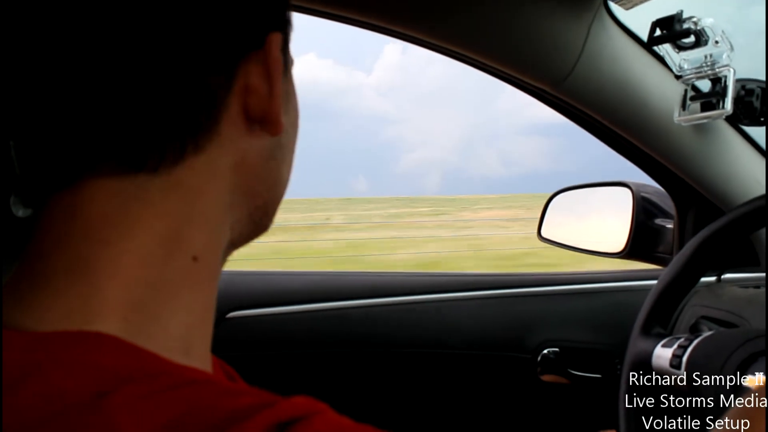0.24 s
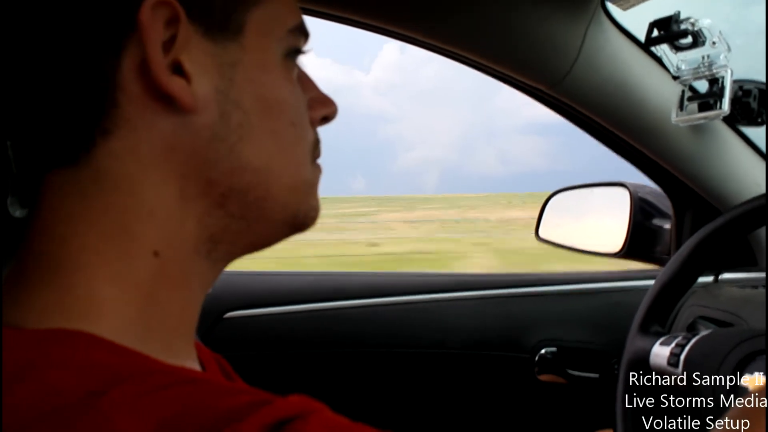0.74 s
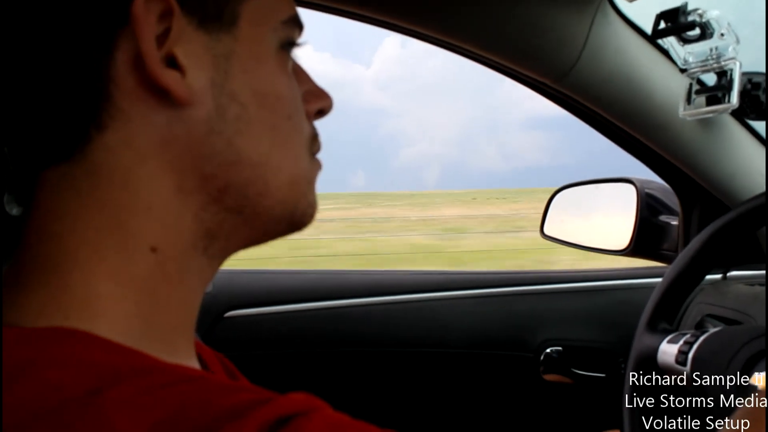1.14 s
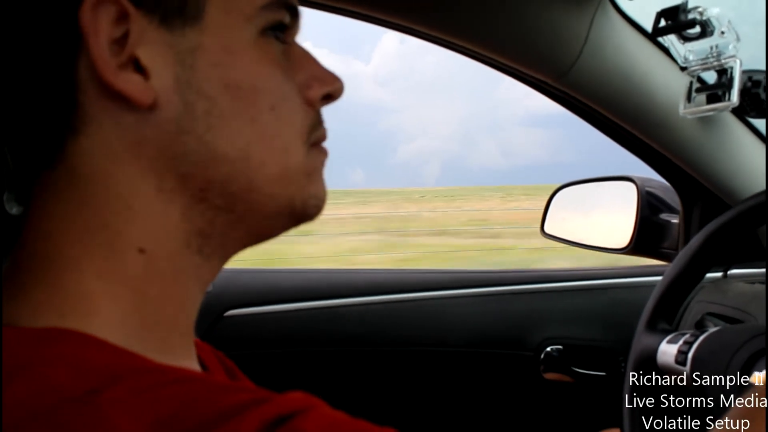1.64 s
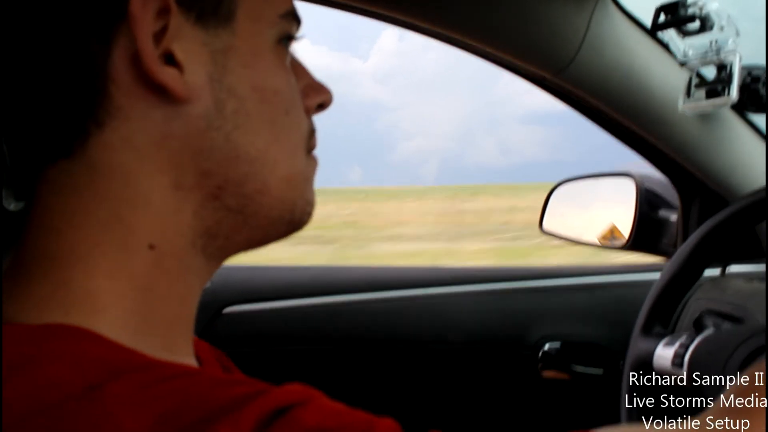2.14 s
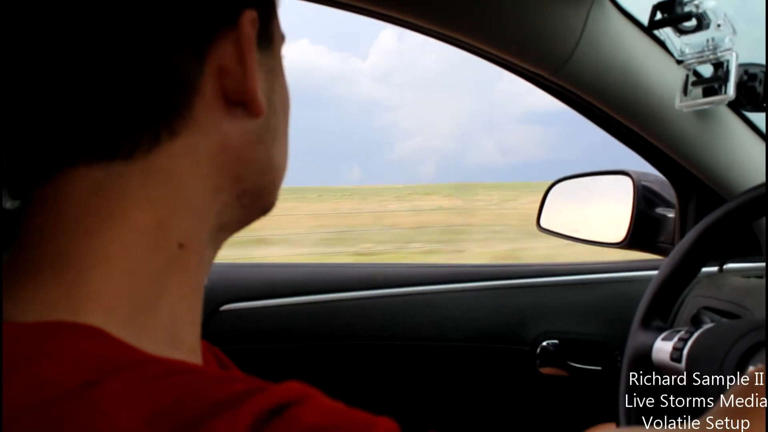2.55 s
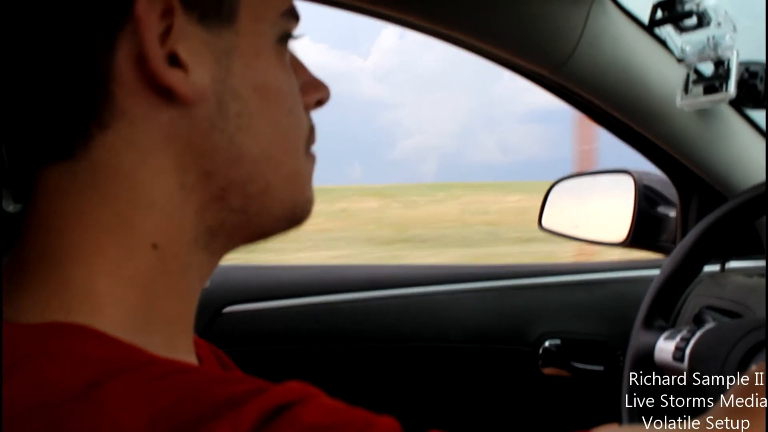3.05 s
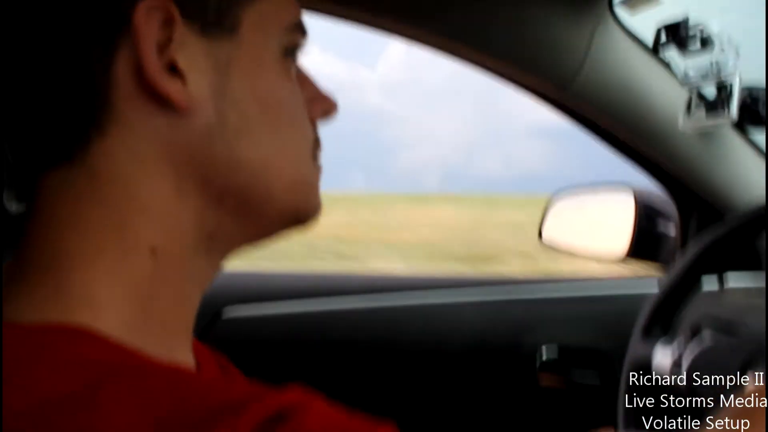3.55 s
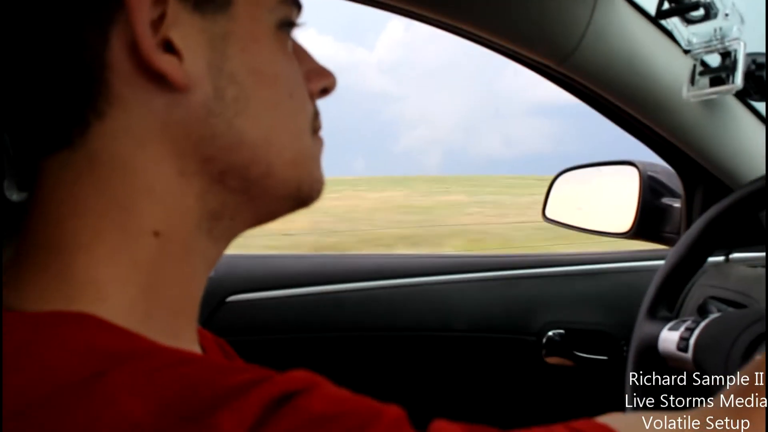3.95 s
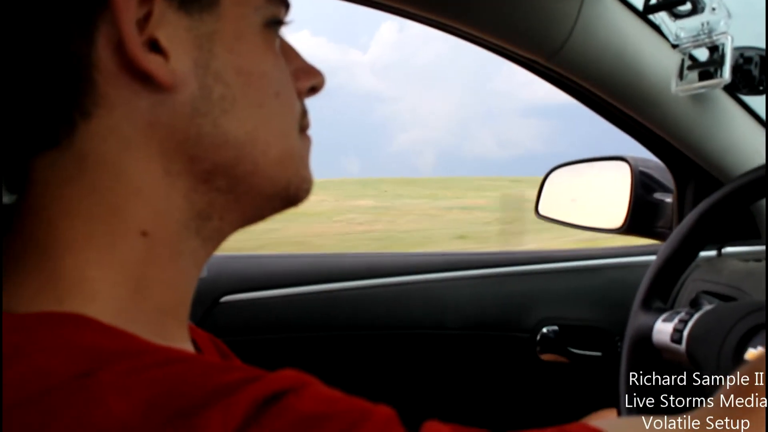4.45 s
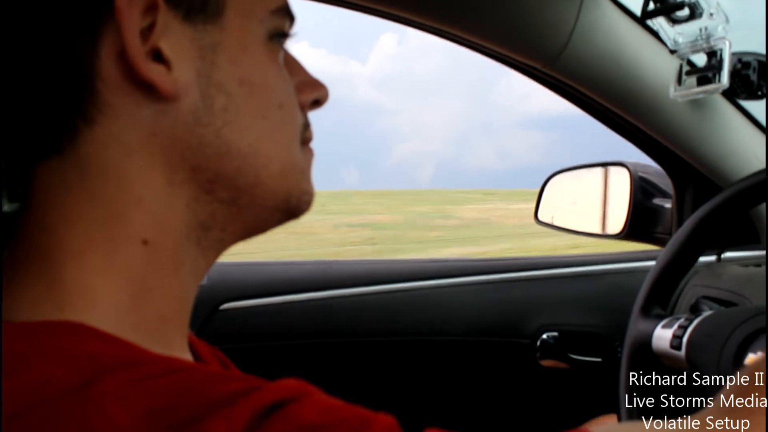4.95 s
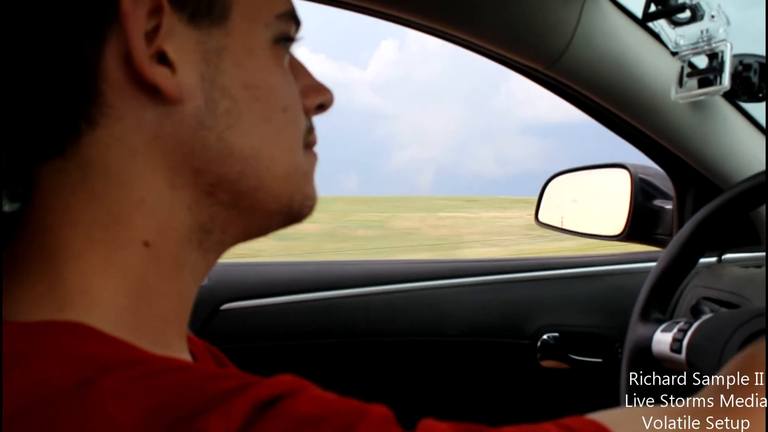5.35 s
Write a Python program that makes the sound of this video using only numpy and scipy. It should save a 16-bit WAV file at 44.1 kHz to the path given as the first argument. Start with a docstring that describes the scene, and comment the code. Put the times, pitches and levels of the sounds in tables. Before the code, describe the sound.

Inside a car on a dirt road, a low, booming tyre rumble runs under irregular wind buffeting and a soft rush of air.

```python
"""Tyres rumble on a dirt and gravel road, heard inside a car running at a steady speed.
They shake the body and set the cabin booming while the car bounces on its springs.
Eddies (small swirls of wind) thud on the microphone, and the hardest overload it.
Rushing air and gravel hiss come in at the side window, whose gap whistles faintly.
Now and then a stone ticks against the underside."""
import sys
import numpy as np
from scipy import signal
from scipy.fft import rfft, irfft
from scipy.io import wavfile
from scipy.ndimage import map_coordinates

SR = 44100
rng = np.random.default_rng(int(sys.argv[2]) if len(sys.argv) > 2 else 0)


def transcribe(u):
    """Save the signal u as a 16-bit wav file named by the first command-line argument.

    u: samples, shape (n,) or (channels, n), limited to [-1, 1]; the rate is SR.
    q: integer samples, one column per channel.
    """
    v = np.clip(np.atleast_2d(u).T, -1, 1)
    q = np.round(v * 32767).astype(np.int16)
    wavfile.write(sys.argv[1], SR, q)


N = 247342
TIME = np.arange(N) / SR
FREQS = np.maximum(np.fft.rfftfreq(N, 1 / SR), 1)


# How loud the road is, the base for rumble and boom: t/s, level/dB
ROAD_LEVEL = [(0, -17), (0.42, -34.5), (0.8, -22), (1.05, -26.5), (1.35, -28.5), (2.0, -24.5),
              (2.45, -20.5), (3.5, -21.5), (4.7, -22), (5.25, -23.5)]
# The tone of the tyres through the car body: f/Hz, relative level/dB
RUMBLE_TONE = [(30, -36), (70, -15), (100, 0.5), (160, -3.5), (215, -2), (280, -7), (335, -13.5),
               (430, -12.5), (540, -15), (800, -25), (2000, -41), (6000, -110)]
def tyre_rumble(air_db, usual_air_db=-43):
    """Tyres shake the body over rough and smooth dirt; the rumble swells with the airflow."""
    patches = undb(0.5 * np.tanh(walk(32)))
    body = unit(through(noise() * patches, colour(RUMBLE_TONE)))
    gust_db = 0.7 * (air_db - usual_air_db)
    return undb(curve(ROAD_LEVEL) - 1 + gust_db) * body


# Stretches of road with ruts: middle t/s, length/s, boost/dB
RUTS = [(0.81, 0.033, 5), (2.11, 0.065, 7.5), (2.41, 0.16, 7), (2.88, 0.058, 3.5), (3.31, 0.032, 7),
        (3.53, 0.047, 10.5), (4.78, 0.028, 14), (5.55, 0.061, 13.5)]
def cabin_boom():
    """The air in the cabin booms at its own low note, louder over ruts."""
    boom = wander(ringing(hz=126.2, width_hz=23.8), share=0.029, rate=5.9)
    return undb(curve(ROAD_LEVEL) - 4 + swells(RUTS)) * boom


# How hard the car bounces: t/s, level/dB
BOUNCE_LEVEL = [(0.05, -27), (0.55, -28), (0.83, -25.5), (1.1, -30), (1.95, -29.5), (2.25, -22.5),
                (3.05, -19.5), (3.2, -22.5), (3.8, -25.5), (4.05, -22.5), (4.75, -30), (5.5, -27)]
def bounce():
    """The car bounces on its springs with a very deep shudder."""
    shudder = unit(band(noise(), 18, 55, low_order=2, high_order=3))
    return undb(curve(BOUNCE_LEVEL) + 1) * shudder


# The strongest eddies: middle t/s, length/s, level/dB, f/Hz above which the thud fades
STRONG_EDDIES = [(0.054, 0.0057, -5.5, 302), (.151, 0.0022, -7, 480), (.186, 0.0016, -3, 375),
                 (.200, 0.0061, -9.5, 546), (.253, 0.015, -18, 480), (.317, 0.0018, -13, 344),
                 (.372, 0.014, -19.5, 316), (.419, 0.0069, -19, 328), (.483, 0.0078, -18.5, 238),
                 (.511, 0.0061, -9, 207), (.623, 0.003, -15, 304), (.657, 0.0089, -11.5, 172),
                 (.79, 0.0048, -13.5, 380), (.81, 0.091, -17.5, 245), (.848, 0.0077, -11, 307),
                 (.903, .004, -15, 180), (.939, 0.0034, 1, 315), (.946, 0.0014, 1.5, 630),
                 (.964, 0.004, -8, 560), (.978, 0.0056, -8.5, 290), (.98, 0.031, -21, 574),
                 (.999, 0.0032, -9, 276), (1.15, 0.033, -19, 340), (1.152, 0.00156, -4, 520),
                 (1.212, 0.015, -19.5, 410), (1.341, 0.00061, -2.5, 320), (1.526, 0.0086, -12.5, 280),
                 (1.539, 0.0023, -7.5, 240), (1.611, 0.0024, -14, 580), (1.633, 0.04, -18.5, 546),
                 (1.725, 0.00068, -5, 380), (1.763, 0.0077, -13, 305), (2.097, 0.01, -9, 209),
                 (2.685, 0.021, -7, 248), (3.04, 0.0021, -16, 400), (3.076, 0.003, -2.5, 320),
                 (3.083, 0.0033, -5, 200), (3.109, 0.0039, -8.5, 457), (3.118, 0.0019, -4, 380),
                 (3.141, .004, -10, 230), (3.16, 0.0035, -14, 318), (3.521, 0.0032, -6, 189),
                 (3.602, 0.0047, -6.5, 243), (3.62, .0015, -7.5, 310), (3.729, 0.0013, -4, 240),
                 (3.813, 0.0019, -2, 275), (3.889, 0.0085, -8, 263), (3.949, 0.0051, -18, 510),
                 (3.99, 0.037, -16.5, 290), (3.993, 0.0017, -7, 245), (4.07, 0.0038, -10, 540),
                 (4.081, 0.0028, -8, 280), (4.265, 0.0085, -10, 325), (4.32, 0.022, -17.5, 310),
                 (4.346, 0.004, -10.5, 367), (4.415, 0.0063, -17, 420), (4.432, 0.0049, -3, 252),
                 (4.525, 0.0024, -10.5, 225), (4.713, 0.01, -10, 280), (4.725, 0.0018, -7.5, 440),
                 (4.752, 0.008, -12, 500), (4.775, 0.036, -21, 390), (4.784, 0.0032, -5, 200),
                 (4.877, 0.0022, -8.5, 262), (4.939, 0.011, -7, 151), (4.969, 0.0095, -9.5, 173),
                 (5.031, 0.007, -10.5, 232), (5.064, 0.0015, 1, 169), (5.143, 0.01, -18.5, 295),
                 (5.285, 0.008, -11, 240), (5.476, 0.0037, -7, 310)]
def wind_thuds(core_s=0.0045):
    """Each eddy hits the microphone as one push of air inside a ragged burst of smaller kicks."""
    out = np.zeros(N)
    t = np.arange(-4096, 4096) / SR
    for s, length, db, hz in STRONG_EDDIES + weak_eddies():
        swirl = thud_tone(kicks(t, 0.69 * length), hz)
        core = thud_tone((t == 0) * rng.choice([-1., 1.]), hz)
        # a short eddy is mostly the one push, a long one mostly swirl
        share = np.exp(-length / core_s)
        eddy = np.sqrt(share) * core + np.sqrt(1 - share) * swirl
        eddy = eddy / np.sqrt(np.sum(eddy ** 2))
        gain = undb(db) * np.sqrt(length * SR)  # the level is an average over the eddy's length
        add(out, s + t[0] - .5 / hz, gain * eddy)  # start early: the peak comes half a cycle late
    return out


def weak_eddies(per_s=9, length_s=0.0083, db=-19, hz=198):
    """Weaker eddies come by chance, each a little different; gives rows like STRONG_EDDIES."""
    return [((k + .5 + .5 * late) / per_s, length_s * 2 ** stretch,
             db + 5.5 * size, hz * 2 ** (0.32 * pitch))
            for k, (late, size, pitch, stretch) in enumerate(rng.uniform(-1, 1, (64, 4)))]


def kicks(t, spread_s, per_s=550):
    """Uneven pushes and pulls of air that swell and fade around time zero."""
    at = (np.arange(-128, 128) + rng.random(256)) / per_s
    size = rng.choice([-1., 1.], len(at)) * undb(2.97 * noise(len(at)))
    fade = np.exp(-.5 * (at / spread_s) ** 2)
    return np.histogram(at, len(t), (t[0], t[-1]), weights=size * fade)[0]


def thud_tone(x, hz, opening_hz=1250):
    """Dull the kicks into a thud; faster eddies reach higher in pitch and carry less bass."""
    x = butter(butter(x, hz, "low", order=1), hz, "low", order=2)
    # the microphone's opening smooths out the finest swirls
    x = band(x, 0.36 * hz, opening_hz, low_order=2, high_order=3)
    return x / np.sqrt(np.sum(x ** 2))


# Cracks from the sharpest eddies: t/s, peak level/dB
CRACKLES = [(0.2, -21), (0.247, -25), (.939, -15), (0.963, -20), (1.635, -28), (3.814, -30), (4.433, -20),
            (4.726, -21), (4.754, -21), (4.878, -22), (5.062, -24)]
def wind_crackles():
    """The sharpest eddies tear on the rim of the microphone's opening and crackle."""
    out = np.zeros(N)
    t = np.arange(-1024, 1024) / SR
    for s, db in CRACKLES:
        crack = band(kicks(t, spread_s=0.002), 950, 1800, low_order=2, high_order=3)
        add(out, s + t[0], undb(db) * crack / np.max(abs(crack)))
    return out


def wind_flutter(db=-31, patchy_db=6):
    """Small eddies keep flapping at the microphone between the big ones."""
    flaps = noise() * undb(patchy_db * np.tanh(walk(38)))
    return undb(db) * unit(band(flaps, 210, 262, low_order=2, high_order=3))


# How strongly air flows past the side window: t/s, level/dB
AIR_LEVEL = [(0.03, -43), (0.29, -48.5), (0.785, -40.5), (0.91, -42.5), (1.03, -48.5), (1.55, -49),
             (2.02, -42.5), (2.28, -38.3), (2.42, -38.5), (2.52, -40.5), (2.65, -36.5), (2.75, -42.5),
             (3.02, -37.5), (3.19, -51.5), (3.3, -41.5), (3.45, -39), (3.7, -42), (3.81, -40.5), (3.9, -45),
             (4.15, -48.5), (4.23, -43.5), (4.42, -46), (4.51, -47), (4.73, -42.5), (4.86, -46.5),
             (5.2, -50), (5.58, -43.5)]
# The tone of the air and gravel hiss: f/Hz, relative level/dB
RUSH_TONE = [(150, 23), (400, 7.5), (700, 4.5), (1030, 5.5), (1270, 1), (1950, 2.5), (2400, -1),
             (3000, -2.5), (4100, -10.5), (5300, -15), (7300, -15.5), (8500, -21.5), (10000, -23.5),
             (12000, -32), (15000, -52)]
# Notes at which the window gap rings: f/Hz, base width/Hz, relative level/dB
GAP_NOTES = [(1420, 76, 5), (1704, 107, 0), (2200, 61, 1.5), (2462, 78, 4.5), (2896, 290, -0.5)]
# Extra brightness in the hiss: t/s, boost/dB
TREBLE_BOOST = [(0, 4), (1.5, 3.5), (2.7, 0), (3.4, -0.3), (4.2, 2.5), (5.3, 0.5)]
def window_rush(air_db, grains_per_s=2500, grit_db=-9):
    """Fluttering air hiss mixes with the crunch of gravel; the window gap adds wavering notes."""
    grain_db = 4 * np.minimum(rng.exponential(size=N), 4)
    grit = unit(noise() * (rng.random(N) < grains_per_s / SR) * undb(grain_db))
    hiss = through(noise() + undb(grit_db) * grit, colour(RUSH_TONE))
    for hz, width_hz, db in GAP_NOTES:
        ring = through(noise(), colour(RUSH_TONE) * resonance(hz, 1.32 * width_hz) ** 2)
        hiss += undb(db + 1.4 * walk(5.7)) * wander(ring, share=0.00696, rate=4.88)
    hiss *= undb(0.95 * walk(19))  # quick flutter
    hiss /= np.std(through(hiss, (FREQS > 2200) & (FREQS < 4000)))  # this band sets the level
    # the top of the hiss rises and falls on its own as the wind turns
    treble = through(hiss, 1 / (1 + (4800 / FREQS) ** 6))
    return undb(air_db + 0.5) * (hiss - treble + undb(curve(TREBLE_BOOST)) * treble)


# Gusts that make the window gap sing: middle t/s, length/s, level/dB
WHISTLE_GUSTS = [(2.33, .06, -42), (2.57, 0.098, -47), (2.824, 0.015, -36.5), (3.0, 0.032, -47),
                 (3.386, .025, -45), (3.767, .04, -42)]
def gap_whistle():
    """Now and then the air catches the window gap just right and it whistles faintly."""
    swell = swells([(s, length, undb(db)) for s, length, db in WHISTLE_GUSTS])
    return swell * ringing(hz=2492, width_hz=50)


# Brief hisses at the window edge: middle t/s, length/s, level/dB
EDGE_HISSES = [(0.1, 0.071, -58), (2.4, .025, -52), (3.605, 0.033, -46.5), (3.785, 0.041, -48.5)]
def edge_hiss():
    """Now and then the window edge adds a brief, high, airy hiss."""
    swell = swells([(s, length, undb(db)) for s, length, db in EDGE_HISSES])
    return swell * unit(through(noise(), resonance(hz=7300, width_hz=2000) ** 2))


# Stones hitting the car: t/s, peak level/dB
STONE_HITS = [(2.295, -36), (2.405, -35), (2.807, -41), (3.303, -42.5), (3.512, -33), (4.008, -34),
              (4.033, -38), (4.185, -41), (4.433, -37)]
def stone_ticks(decay_s=0.0042):
    """Stones flung against the underside make tiny bright ticks."""
    out = np.zeros(N)
    t = np.arange(2048) / SR
    for s, db in STONE_HITS:
        burst = noise(len(t)) * np.exp(-t / decay_s)
        tick = band(burst, 3500, 7700, low_order=2, high_order=3)
        add(out, s, undb(db) * tick / np.max(abs(tick)))
    return out


def undb(db):
    """Turn decibels into a number to multiply by."""
    return 10 ** (np.asarray(db) / 20)


def unit(x):
    """Scale to an average strength (rms) of one."""
    return x / np.sqrt(np.mean(x ** 2))


def noise(count=N):
    """White noise: an even hiss."""
    return rng.standard_normal(count)


def walk(rate):
    """A smooth random wobble of size one, changing about rate times a second."""
    return unit(through(noise(), np.exp(-(FREQS / rate) ** 2) * (FREQS > 1)))


def wander(x, share, rate):
    """Let the pitch drift by a small share, about rate times a second."""
    position = np.arange(N) + np.cumsum(share * walk(rate))
    return map_coordinates(x, [position], order=1, mode="mirror")


def colour(points):
    """The strength of every frequency, from (f/Hz, level/dB) points."""
    hz, db = np.transpose(points)
    return undb(np.interp(np.log(FREQS), np.log(hz), db))


def resonance(hz, width_hz):
    """A filter for something that rings near hz; the narrower, the purer the note."""
    return 1 / (1 + 1j * (FREQS ** 2 - hz ** 2) / (FREQS * width_hz))


def ringing(hz, width_hz):
    """A note kept going by noise, squashed so that its strength stays fairly even."""
    ring = signal.hilbert(unit(through(noise(), resonance(hz, width_hz) ** 2)))
    return unit(ring.real / np.sqrt(1 + abs(ring) ** 2))


def through(x, response):
    """Turn each frequency of a sound up or down by the given response."""
    return irfft(rfft(x) * response, N)


def butter(x, hz, kind, order):
    """Keep the "low" or "high" side of hz; a higher order cuts more sharply."""
    return signal.sosfilt(signal.butter(order, hz, kind, fs=SR, output="sos"), x)


def band(x, low_hz, high_hz, low_order, high_order):
    """Keep what lies between two frequencies."""
    return butter(butter(x, low_hz, "high", low_order), high_hz, "low", high_order)


def curve(table):
    """Join (t/s, value) points with straight lines."""
    return np.interp(TIME, *np.transpose(table))


def swells(table):
    """Add up bell-shaped swells from (t/s, length/s, height) rows."""
    return sum(height * np.exp(-((TIME - s) / length) ** 2) for s, length, height in table)


def add(out, s, x):
    """Mix a short sound in, starting at time s."""
    at = int(s * SR) + np.arange(len(x))
    inside = (at >= 0) & (at < N)
    out[at[inside]] += x[inside]


def scene():
    """The car on the road, air at the window and wind on the microphone, in one channel."""
    air_db = curve(AIR_LEVEL)
    car = bounce() + tyre_rumble(air_db) + cabin_boom() + stone_ticks()
    window = window_rush(air_db) + edge_hiss() + gap_whistle()
    wind = wind_flutter() + wind_thuds() + wind_crackles()
    return (car + window + wind)[None]


def record(dry, top_hz=15700):
    """The hardest thuds overload and are flattened; the very highest treble is cut off."""
    treble_cut = signal.ellip(8, .2, 70, top_hz, fs=SR, output="sos")
    return signal.sosfilt(treble_cut, np.clip(dry, -1, 1))


dry = scene()
out = record(dry)
transcribe(out)
```